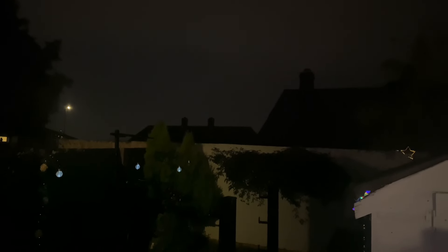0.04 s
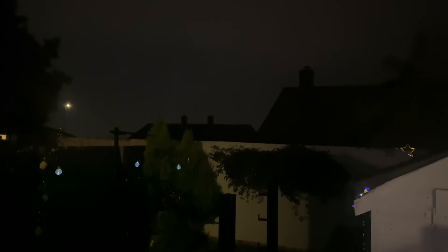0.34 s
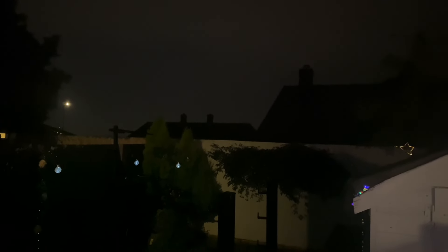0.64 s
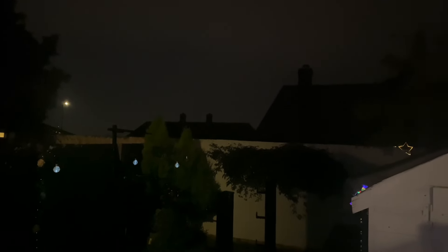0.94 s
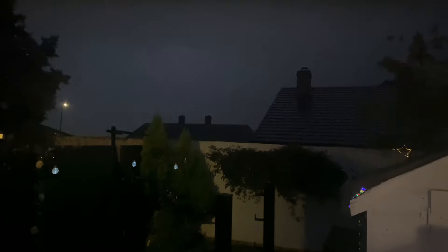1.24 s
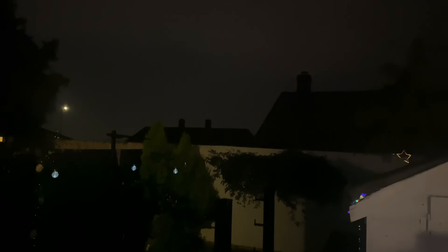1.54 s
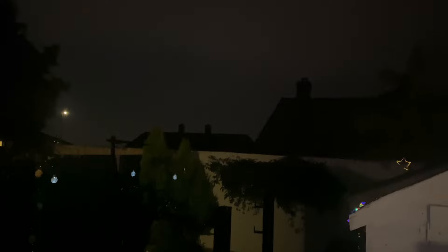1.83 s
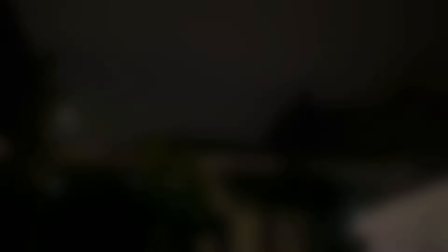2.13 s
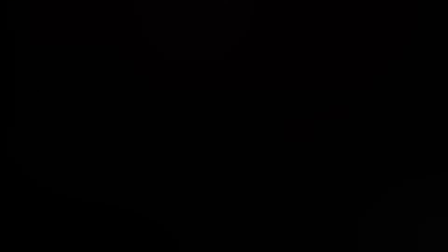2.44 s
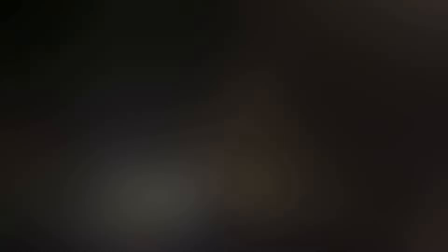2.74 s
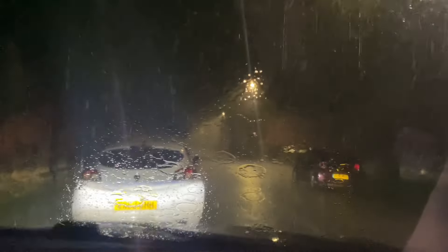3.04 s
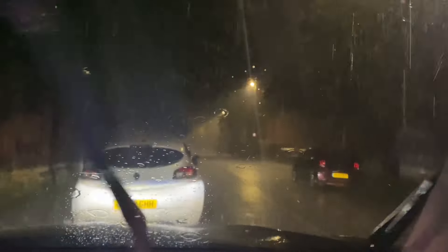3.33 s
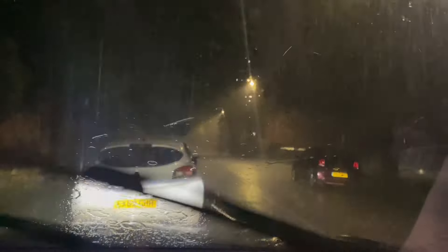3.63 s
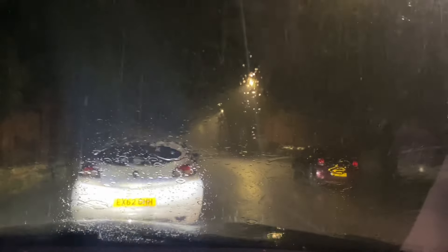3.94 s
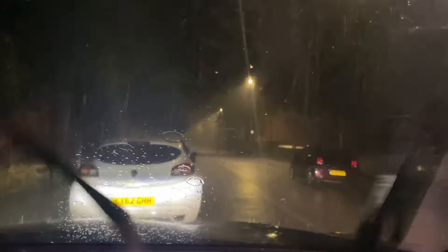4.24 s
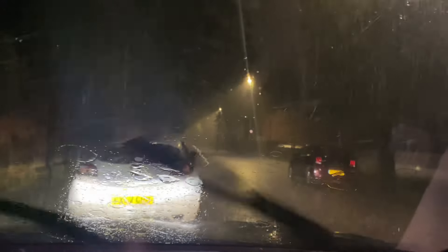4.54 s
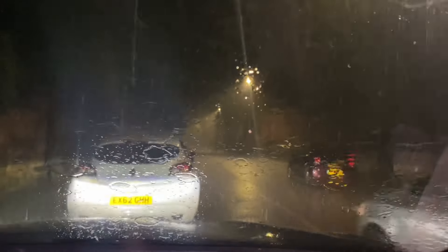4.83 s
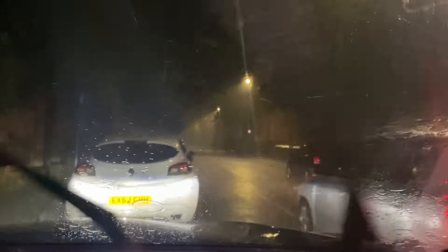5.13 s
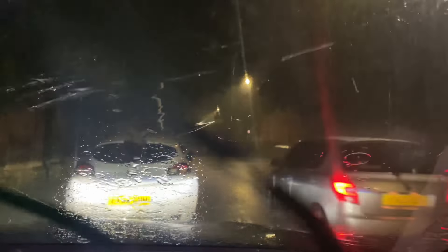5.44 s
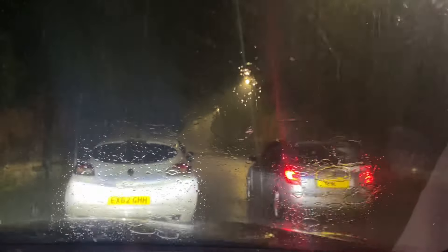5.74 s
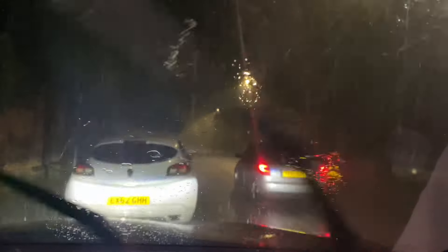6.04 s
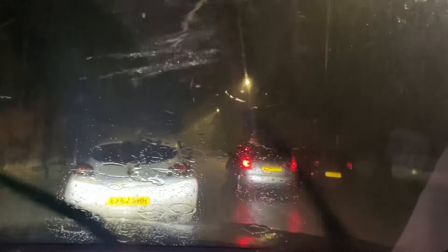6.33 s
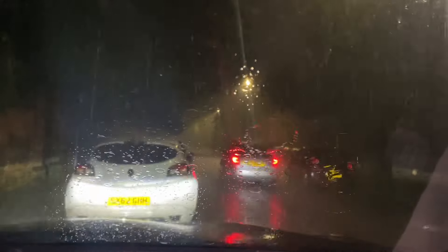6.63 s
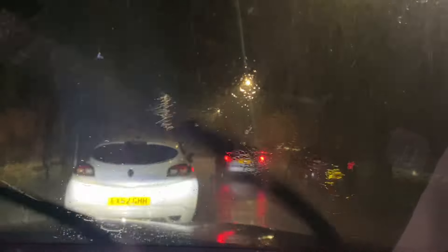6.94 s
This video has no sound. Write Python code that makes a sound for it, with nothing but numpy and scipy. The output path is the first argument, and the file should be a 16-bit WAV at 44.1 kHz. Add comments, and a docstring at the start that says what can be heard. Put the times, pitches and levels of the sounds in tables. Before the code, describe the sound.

Light rain drips in a garden, then abruptly heavy rain drums on a car roof, with fast wipers thumping and the engine idling.

```python
"""A garden at night, then abruptly, with a click, the inside of a car in a downpour.
In the garden light rain patters on leaves and drips close by, over a low distant rumble.
In the car drops drum on the roof panels and tick on the windscreen, and the engine idles.
The wipers run at full speed: at each end of their stroke the blades flip over with a knock
and the arms stop with a low thump."""
import sys
import numpy as np
from scipy import signal
from scipy.fft import rfft, irfft
from scipy.io import wavfile
from scipy.ndimage import uniform_filter1d, minimum_filter1d

SR = 44100
rng = np.random.default_rng(int(sys.argv[2]) if len(sys.argv) > 2 else 0)


def store_wav(level_fs):
    """Save 16-bit WAV to argv[1]."""
    pcm = np.round(np.clip(np.atleast_2d(level_fs), -1, 1) * 32767)
    wavfile.write(sys.argv[1], SR, pcm.T.astype(np.int16))


N = 312165
TIME, BINS = np.arange(N) / SR, np.fft.rfftfreq(N, 1 / SR)
INSIDE_S = 2.5436  # the garden gives way to the car


def amp(db):
    """Decibels to gain."""
    return 10 ** (np.asarray(db) / 20)


def unit(x):
    """Scales to an rms of 1."""
    return x / np.sqrt(np.mean(x ** 2) + 1e-20)


def per_bin(points):
    """Joins (Hz, value) points on a log-frequency axis."""
    hz, value = np.transpose(points)
    return np.interp(np.log(BINS + 1), np.log(hz + 1), value)


def course(points):
    """Joins (s, value) points in time, less their average inside the car."""
    value = np.interp(TIME, *np.transpose(points))
    return value - value[TIME > INSIDE_S].mean()


def below(corner_hz, order):
    """Low-pass slope in dB for each bin."""
    return -10 * np.log10(1 + (BINS / corner_hz) ** (2 * order))


def above(corner_hz, order):
    """High-pass slope in dB for each bin."""
    return -10 * np.log10(1 + (corner_hz / (BINS + 1)) ** (2 * order))


def lifts(modes, bins):
    """Bell-shaped resonances in dB for each bin."""
    return sum(db / (1 + (2 * (bins - hz) / width) ** 2) for hz, width, db in modes)


def colour(x, db):
    """Filters by a gain in dB for each bin; rms 1."""
    return unit(irfft(rfft(x) * amp(db), N))


def causal(gain):
    """Gives a gain curve the phase that makes it ring only after the blow."""
    log_gain = np.log(np.concatenate([gain, gain[-2:0:-1]]))
    return np.exp(np.conj(signal.hilbert(log_gain)))[:len(gain)]


def add(mix, start_s, sound):
    """Mixes a sound in, in place."""
    part = mix[..., max(round(start_s * SR), 0):][..., :sound.shape[-1]]
    part += sound[..., :part.shape[-1]]


def noise():
    """Two unrelated white noises."""
    return unit(rng.standard_normal((2, N)))


def drift(rate_hz):
    """Random wander with an rms of 1."""
    return colour(rng.standard_normal(N), below(rate_hz, order=2))


def patter(per_s, spread_db, rise_s, ring_s, tint_db, spots=160, size=2048):
    """Drops of uneven size land on many spots; each spot gives a short burst of its own colour."""
    t, f, out = np.arange(size) / SR, np.fft.rfftfreq(size, 1 / SR), np.zeros((2, N))
    lands = rng.random(N) < per_s / SR
    spot = rng.integers(0, spots, N)
    weight = amp(spread_db * np.minimum(rng.exponential(1, N), 3)) * rng.choice([-1, 1], N)
    knots_hz = np.geomspace(100, 16000, 18)
    curves = 2 * rng.random((spots, len(knots_hz))) - 1
    tints = np.array([causal(amp(tint_db * np.interp(f, knots_hz, curve))) for curve in curves])
    envelope = unit((1 - np.exp(-t / rise_s)) * amp(-60 * t / ring_s))
    bursts = irfft(rfft(rng.standard_normal((spots, 2, size)) * envelope) * tints[:, None])
    for at in np.flatnonzero(lands):
        add(out, at / SR, weight[at] * bursts[spot[at]])
    return unit(out)


def drops(rows, tail_s, tail_db, top_hz, crack_db, crack_s=0.0014, size=8192):
    """Hits of rain: a brief wide crack, a band of noise (hollow when narrow), then a weaker spatter."""
    t, f, out = np.arange(size) / SR, np.fft.rfftfreq(size, 1 / SR) + 1, np.zeros((2, N))
    roll_off = 1 / np.sqrt(1 + (f / top_hz) ** 10)  # rolls off the top treble of each drop
    for start_s, db, hz, width, ring_s in rows:
        envelope = amp(-60 * t / ring_s) + amp(tail_db - 60 * t / tail_s)
        band = 1 / (1 + 1j * (f / hz - hz / f) / width) ** 2
        hit = irfft(rfft(rng.standard_normal((2, size)) * envelope) * band * roll_off)
        crack = rng.standard_normal((2, size)) * amp(crack_db - 60 * t / crack_s)
        add(out, start_s, amp(db) * (hit / abs(hit).max(1, keepdims=True) + crack))
    return out


# Ripple in left-right correlation from microphone spacing. Each row: frequency in Hz, depth 0 to 1.
SPACING_RIPPLE = [(2000, 0), (3700, 0.09), (5500, 0.2), (7200, 0.42), (9200, 0.55), (11000, 0.86)]


def spaced_pair(x, correlation, ripple_hz=3730):
    """Spreads two unrelated signals over two microphones, in and out of phase by frequency."""
    ripple = per_bin(SPACING_RIPPLE) * np.cos(2 * np.pi * BINS / ripple_hz)
    alike = np.clip(per_bin(correlation) + ripple, -.98, .98)
    mid, side = irfft(rfft(x) * np.sqrt([(1 + alike) / 2, (1 - alike) / 2]), N)
    return np.array([mid + side, mid - side])


# Far rumble and wash of rain. Each row: frequency in Hz, relative density in dB.
GARDEN_SPECTRUM = [(20, -23), (50, 2), (100, 4.5), (200, -7), (400, -19), (800, -19.5), (1500, -23.5),
                   (2200, -26), (3300, -29), (5200, -31.5), (8000, -40.5), (10500, -42.5), (13000, -55),
                   (15500, -66.5)]
# Things ringing faintly under the rain. Each row: frequency in Hz, width in Hz, lift in dB.
GARDEN_MODES = [(536, 50, 7), (1280, 42, 1), (2300, 120, 1.5)]
# Swells of the far rumble. Each row: time in seconds, level in dB.
RUMBLE_LEVEL = [(0, -63), (0.3, -48), (0.5, -51.5), (0.65, -64), (0.8, -47.5), (0.95, -69), (1.1, -51.5),
                (1.35, -57), (2.5, -66)]
# Near drips. Each row: start in seconds, relative peak in dB, centre in Hz, bandwidth over centre,
# ring in seconds.
NEAR_DRIPS = [(0.044, -41, 950, 0.6, .03), (0.1226, -38, 2450, .7, .012), (0.177, -45, 2050, .3, .03),
              (0.215, -40, 2200, 1, 0.014), (0.22, -42, 800, 0.87, .04), (0.221, -51, 10300, .25, .025),
              (0.2853, -48, 2000, .5, .02), (0.352, -41.5, 1950, 0.72, .03), (0.503, -44, 2450, 0.33, .025),
              (0.608, -41, 1900, .9, .03), (0.67, -48, 9500, .4, .04), (0.689, -46, 2290, .3, .05),
              (0.76, -47, 9000, .8, .016), (0.817, -48, 5700, .35, .012), (0.8865, -35, 2200, 0.69, 0.031),
              (0.888, -47, 6500, 1.0, .012), (1.117, -40, 1450, 0.37, .035), (1.1513, -46, 2260, .5, .015),
              (1.2406, -37.5, 2100, 1, .018), (1.596, -45.5, 2090, .4, .02),
              (1.7494, -39, 1300, 0.24, .035), (1.751, -37, 680, 0.7, .035), (1.826, -40, 780, .6, .03),
              (1.8726, -41.5, 3600, 1.5, .007), (1.9585, -44, 4500, 1.2, .016),
              (2.158, -39, 1300, 1.4, .025), (2.228, -54, 5400, .4, .025), (2.2653, -49, 1500, .9, .015),
              (2.335, -44, 5300, .45, .018)]
# Each row: frequency in Hz, left-right correlation from -1 to 1.
GARDEN_CORRELATION = [(50, 0.99), (200, 0.95), (500, 0.19), (800, -0.13), (1400, -0.51), (2200, 0.3),
                      (3000, -0.016)]


def garden():
    """A far wash, a rumble that swells and recedes, fine drops on leaves and near drips."""
    air_db = per_bin(GARDEN_SPECTRUM) + lifts(GARDEN_MODES, BINS)
    wash = amp(-43) * colour(noise(), air_db) * amp(.5 * drift(rate_hz=19))
    rumble_db = np.interp(TIME, *np.transpose(RUMBLE_LEVEL))
    rumble = amp(rumble_db) * colour(noise(), above(144, order=3) + below(300, order=3))
    on_leaves = patter(per_s=260, spread_db=2.5, rise_s=0.0003, ring_s=0.038, tint_db=12.5)
    leaves = amp(-58.5) * colour(on_leaves, air_db + above(760, order=2))
    drips = amp(-1) * drops(NEAR_DRIPS, tail_s=0.19, tail_db=-8, top_hz=11500, crack_db=-19)
    return spaced_pair(wash + rumble + leaves + drips, GARDEN_CORRELATION)


# Engine and road boom in the cabin. Each row: frequency in Hz, relative density in dB.
BOOM_SPECTRUM = [(10, -43), (25, -4.5), (38, -3), (55, -1), (90, -3.5), (130, -11.5), (200, -17),
                 (500, -26.5), (2000, -81)]


def engine(idle_hz=27.7):
    """The firing note at idle wavers under the boom of the cabin."""
    firing_hz = idle_hz * (1 + 0.0083 * drift(rate_hz=3.3))
    firing = np.sin(2 * np.pi * np.cumsum(firing_hz) / SR)
    boom = colour(noise(), per_bin(BOOM_SPECTRUM))
    return amp(-22.5) * boom + amp(-29) * np.array([firing, np.zeros(N)])


def pings(per_s, spread_db, low_hz, high_hz, ring_s, size=6000):
    """Some drops hit a stiff patch of the roof, which rings briefly on one note."""
    t, out = np.arange(size) / SR, np.zeros((2, N))
    for when, pitch, weight, place in rng.random((round(per_s * N / SR), 4)):
        hz = low_hz * (high_hz / low_hz) ** pitch
        note = np.sin(2 * np.pi * hz * t) * amp(-60 * t / ring_s) * np.sqrt(hz)
        sides = np.array([[np.cos(2 * np.pi * place)], [np.sin(2 * np.pi * place)]])
        add(out, when * N / SR, amp(spread_db * weight ** 3) * sides * note)
    return unit(out)


# Roof panel modes. Each row: frequency in Hz, width in Hz, lift in dB.
PANEL_MODES = [(163, 30, 3.5), (702, 51, 2.5), (907, 70, 5), (1070, 53, 6.5), (1208, 52, 3.5),
               (1417, 40, 6.5), (1830, 65, 4), (2250, 82, 3.5), (2550, 96, 5), (2660, 29, 1.5),
               (2940, 57, 6), (3220, 68, 2)]
# The roof's broad ring. Each row: time in seconds, relative strength on a log scale.
RING_STRENGTH = [(2.62, 0.7), (3.06, 1.5), (3.22, -2.5), (3.48, 0.3), (4.02, -2.5), (4.22, 0.5),
                 (4.4, -1.5), (4.95, 0.5), (5.15, 0), (5.45, 0.2), (5.61, 2.1), (5.9, -2), (6.07, 2),
                 (6.27, -1.3), (6.55, 1), (6.7, -1.5), (7.0, 0.5)]


def panels(x, detune, uneven_db, rate_hz, ring_hz=1040, ring_width_hz=360):
    """As rain sweeps over the roof, each mode wanders in pitch and swells and fades on its own."""
    frames = dict(fs=SR, nperseg=2048, noverlap=1536)
    hz, t, spectra = signal.stft(x, **frames)
    slow = 1 / (1 + (np.fft.rfftfreq(len(t), t[1]) / rate_hz) ** 2)
    wander = unit(irfft(rfft(rng.standard_normal((len(PANEL_MODES), 2, len(t)))) * slow, len(t)))
    modes = [(mode_hz * (1 + detune * bend), width_hz, db + uneven_db * swell)
             for (mode_hz, width_hz, db), (bend, swell) in zip(PANEL_MODES, wander)]
    ring_db = 1.23 * np.interp(t, TIME, course(RING_STRENGTH) - course(POUR_STRENGTH))
    modes.append((ring_hz, ring_width_hz, ring_db))
    _, rung = signal.istft(spectra * amp(lifts(modes, hz[:, None])), **frames)
    return unit(rung[:, :N])


# Rain on roof and glass, heard from the seats. Each row: frequency in Hz, relative density in dB.
RAIN_SPECTRUM = [(170, -2.5), (240, -9.5), (360, -7.5), (520, -9.5), (750, -15), (1000, -15.5),
                 (1300, -18.5), (1900, -18.5), (2600, -22), (3700, -25.5), (5200, -31), (7200, -37.5),
                 (10500, -43.5), (13500, -61)]
# Surges of the downpour. Each row: time in seconds, relative strength on a log scale.
POUR_STRENGTH = [(2.62, 0.7), (2.7, 0), (2.92, -0.4), (3.1, 1), (3.26, 0), (3.38, -1), (3.47, 1.2),
                 (3.6, -0.9), (3.7, 0.2), (4.15, 0.7), (4.3, 0.8), (4.39, -1.5), (4.49, 0.5), (4.64, -0.5),
                 (4.9, 1), (5.35, -0.2), (5.63, 0.9), (5.85, 0), (6.04, 0.5), (6.2, -0.3), (6.55, 0.7),
                 (6.77, -1.5), (7.04, 0.6)]


def downpour():
    """Dense drumming on the ringing roof, sharper patter and spray on the glass."""
    flurries_db = 0.65 * drift(rate_hz=11)
    swell_db = 1.4 * course(POUR_STRENGTH) + flurries_db
    rain_db = per_bin(RAIN_SPECTRUM) + above(126, order=4)
    roof_db = rain_db + below(3110, order=3)  # the lining muffles the treble
    glass_db = rain_db + above(4950, order=3)  # the glass lets it through
    on_roof = patter(per_s=1200, spread_db=2.5, rise_s=0.00076, ring_s=0.05, tint_db=7)
    on_glass = patter(per_s=750, spread_db=2.5, rise_s=0.00023, ring_s=0.033, tint_db=8)
    ringing = pings(per_s=220, spread_db=5, low_hz=300, high_hz=3300, ring_s=0.08)
    wash = amp(-7) * colour(noise(), roof_db)
    drumming = colour(on_roof, roof_db) + wash + amp(-9) * colour(ringing, roof_db)
    roof = amp(-19.5) * panels(drumming, detune=0.0072, uneven_db=1.5, rate_hz=4.6)
    glass = amp(-41.5) * colour(on_glass, glass_db) + amp(-41) * colour(noise(), glass_db)
    return roof * amp(swell_db) + glass * amp(0.27 * swell_db + 0.99 * drift(rate_hz=10))


# Each row: start in seconds, peak in dB, centre in Hz.
ROOF_HITS = [(2.579, -9, 400), (2.718, -17, 2100), (2.846, -11.5, 380), (3.1, -15, 1250), (3.442, -19, 422),
             (4.1, -11, 314), (4.211, -21, 350), (4.455, -12.5, 380), (4.713, -12, 900), (4.777, -16, 600),
             (5.983, -23, 483), (6.337, -11, 520), (6.483, -12, 436)]


def roof_hits(width=0.86, ring_s=0.04):
    """Heavy drops, hollow knocks and brief surges of rain on the roof, with little crack."""
    rows = [(*row, width, ring_s) for row in ROOF_HITS]
    return drops(rows, tail_s=0.17, tail_db=-25, top_hz=11500, crack_db=-30)


# Each row: start in seconds, relative peak in dB, centre in Hz, bandwidth over centre, ring in seconds.
GLASS_TICKS = [(2.7784, -25, 4000, 0.88, .005), (2.853, -22, 5200, .7, 0.012),
               (3.5745, -23.5, 5000, .7, 0.0054), (3.8999, -23, 4500, 1.0, .005),
               (4.502, -35, 11000, 0.94, .005), (5.0152, -27, 5960, 0.4, .004),
               (5.1175, -27.5, 7000, 1.1, .011), (5.185, -29, 8500, 1.0, .012),
               (5.291, -32, 10500, .4, .006), (5.983, -21, 6300, 0.77, 0.0087),
               (6.0098, -25.5, 6500, 1.2, .014), (6.339, -32, 6000, .8, .005),
               (6.385, -20, 6200, 0.42, 0.0071), (6.5429, -27, 5000, 0.74, .03),
               (6.6284, -42, 12500, .5, .004), (6.885, -28, 7500, .6, 0.0059),
               (6.9135, -16, 6900, 0.48, 0.0071)]


def windscreen_ticks():
    """Hard drops strike the glass, short and bright."""
    return amp(3.5) * drops(GLASS_TICKS, tail_s=0.05, tail_db=-19, top_hz=12300, crack_db=-15)


def knocks(rows, hz, shudder, sag_per_s=1.3):
    """One low resonance of the car swells and dies, shuddering; its pitch sags as the wiper arms slow."""
    out = np.zeros((2, N))
    for peak_s, db, length_s in rows:
        t = TIME - peak_s
        envelope = np.cos(np.pi * np.clip(t / length_s, -.5, .5)) ** 2
        cycles = hz * (t - sag_per_s * t ** 2 / 2) + rng.random()
        out += amp(db) * envelope * np.sin(2 * np.pi * cycles)
    return out * (1 + shudder * np.array([drift(rate_hz=110), drift(rate_hz=140)]))


# Wiper reversals, top and bottom in turn. Each row: thump peak in seconds, relative thump level in dB,
# thump length in seconds, relative flip level in dB, flip length in seconds, flip lead in seconds.
WIPER_TURNS = [(2.567, -12, 0.17, -37, .07, 0.019), (3.025, -7.5, 0.065, -10.5, 0.079, 0.013),
               (3.481, -13, 0.13, -11, 0.1, 0.09), (3.955, -14, 0.21, -8, 0.066, 0.011),
               (4.41, -8, 0.16, -12.5, 0.13, 0.042), (4.9, -12.5, 0.086, -11.5, 0.053, 0.03),
               (5.332, -6.5, 0.061, -8.5, 0.051, .088), (5.806, -6, 0.05, -10, 0.061, 0.019),
               (6.267, -10.5, 0.13, -12.5, 0.13, 0.048), (6.758, -15.5, 0.15, -9, 0.097, 0.036)]


def wipers():
    """At each reversal the blades flip over, then the arms stop with a thump."""
    stops = [(s, db, length_s) for s, db, length_s, _, _, _ in WIPER_TURNS]
    flips = [(s - lead_s, db, length_s) for s, _, _, db, length_s, lead_s in WIPER_TURNS]
    arms = amp(-0.7) * knocks(stops, hz=93.2, shudder=0.11)
    blades = amp(-3.5) * knocks(flips, hz=165.7, shudder=0.66)
    return arms + blades


def linkage(length_s=0.068, lead_s=0.033):
    """The wiper linkage rumbles through the bulkhead while it brakes and turns the arms."""
    load = sum(np.exp(-((TIME - s + lead_s) / length_s) ** 2) for s, *_ in WIPER_TURNS)
    return amp(-22.5) * load * colour(noise(), above(92, order=3) + below(203, order=3))


# Each row: frequency in Hz, left-right correlation from -1 to 1.
CABIN_CORRELATION = [(30, -0.24), (170, 0.83), (430, 0.52), (680, -0.32), (1000, 0.19), (1400, -0.17),
                     (2700, -0.25), (3600, -0.016)]


def cabin():
    """Rain, engine and wipers inside the car; the thumps reach both microphones nearly alike."""
    thumps = wipers()
    diffuse = linkage() + downpour() + roof_hits() + windscreen_ticks() + engine()
    return spaced_pair(diffuse, CABIN_CORRELATION) + thumps


def scene():
    """The garden first, then with a dry click the car."""
    since_s = np.maximum(TIME - INSIDE_S, 0)
    click = amp(-8.5) * np.exp(-since_s / 0.0016)
    return np.where(since_s > 0, cabin() + click, garden())


# Microphone imbalance. Each row: frequency in Hz, left minus right in dB.
PAIR_BALANCE = [(60, -1.5), (110, -3), (200, -2), (380, 0.5), (700, 2), (1290, -1), (2380, -1.5),
                (4400, 2.5), (8120, -0.5), (15000, -0.5)]


def record(dry, ceiling=.9, top_hz=15500):
    """The two microphones differ a little in colour; a limiter eases the peaks; then a low-pass."""
    tinted = irfft(rfft(dry) * amp(per_bin(PAIR_BALANCE) * np.array([[.5], [-.5]])), N)
    allowed = ceiling / np.maximum(abs(tinted).max(0), ceiling)
    limited = tinted * uniform_filter1d(minimum_filter1d(allowed, size=301), size=301)
    low_pass = signal.firwin(511, top_hz, window=("kaiser", 9), fs=SR)
    return signal.oaconvolve(limited, low_pass[None], "same")


dry = scene()
out = record(dry)
store_wav(out)
```